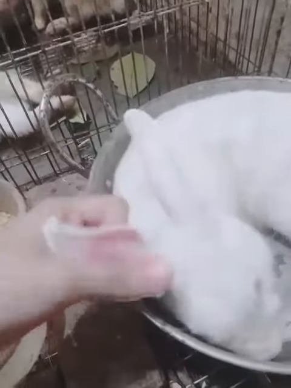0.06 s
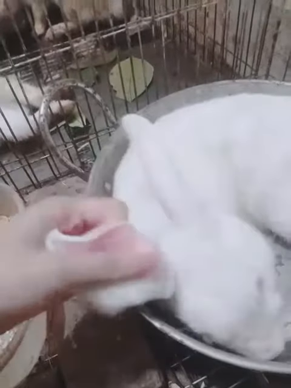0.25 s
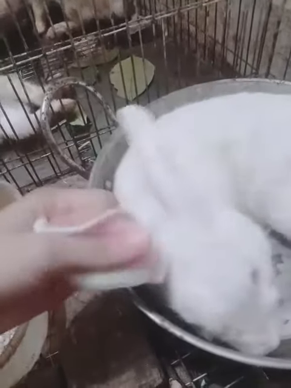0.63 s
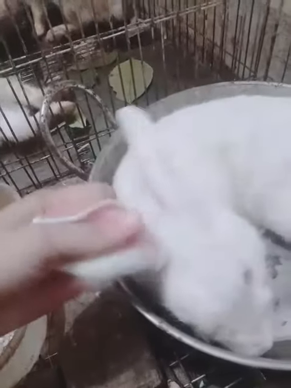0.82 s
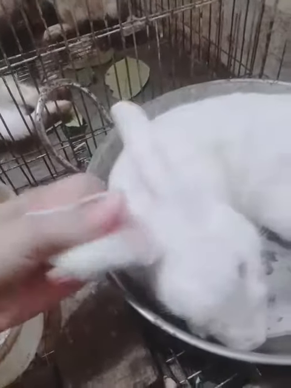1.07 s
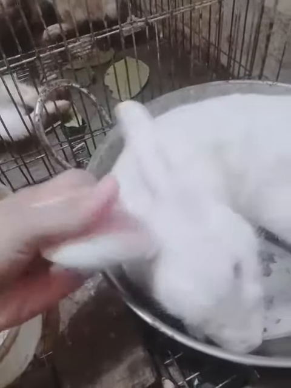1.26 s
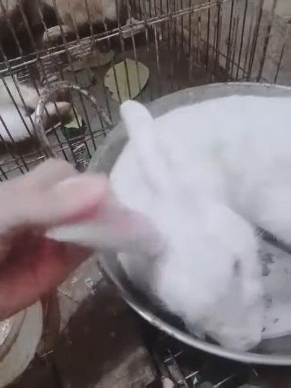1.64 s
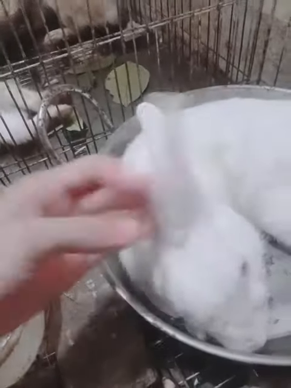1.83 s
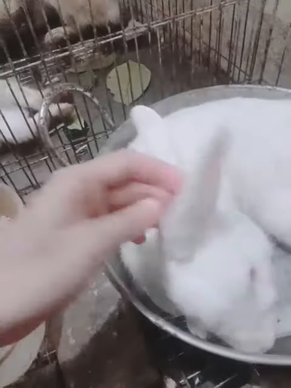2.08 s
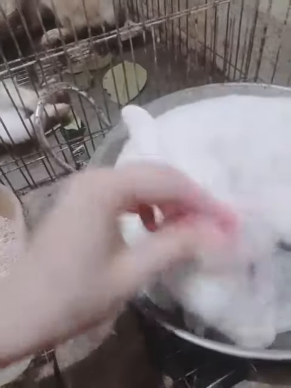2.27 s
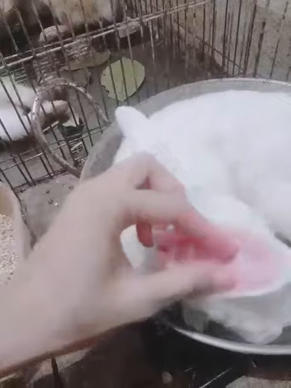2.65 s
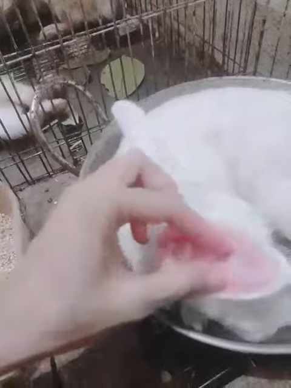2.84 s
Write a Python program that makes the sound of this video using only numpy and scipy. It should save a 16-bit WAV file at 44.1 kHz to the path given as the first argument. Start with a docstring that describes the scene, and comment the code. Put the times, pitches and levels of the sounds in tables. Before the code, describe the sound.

Short, shrill squeaks repeat quickly as a hand softly rubs a rabbit's ear.

```python
"""Fur rustles softly as a hand rubs a rabbit's ear in a small hard-walled room, over a low rumble and hum.
From 0.13 s come short, shrill squeaks, about five a second, each air forced through a tight wet opening:
it pops, its pitch settles, holds and drops, and the walls throw it back. The wavering hum swells at times.
After the last squeak, near 2.4 s, the rustle fades to faint steady microphone hiss,
while rumble and hum go on."""
import sys
import numpy as np
from scipy import signal
from scipy.fft import rfft, irfft
from scipy.io import wavfile
from scipy.ndimage import map_coordinates

SR = 44100
rng = np.random.default_rng(int(sys.argv[2]) if len(sys.argv) > 2 else 0)


def file_out(sig):
    """Save sig as 16-bit WAV at sys.argv[1]."""
    # one column per channel
    cols = np.atleast_2d(sig).T
    # limit, then scale
    lim = np.clip(cols, -1, 1)
    pcm = np.round(lim * 32767).astype(np.int16)
    wavfile.write(sys.argv[1], SR, pcm)


N = 127890

# start_s, start_hz, held_hz, settle_s, drop_share, length_s, level_db, roughness, second_db, higher_db
SQUEAK_EVENTS = [ (0.13, 1127, 1681, .011, 0.202, .040, -45.5, 0.25, 4, -4),
                 (0.42, 2040, 1933, 0.0011, 0.382, .015, -38.5, 0.48, -1, 0),
                 (0.651, 2180, 2036, 0.00098, 0.37, 0.013, -37, 0.34, -0.5, 0.5),
                 (0.871, 2210, 2021, 0.00077, 0.43, .013, -38.5, 0.53, 1.5, 0.5),
                 (1.081, 2186, 2015, .0008, 0.28, 0.014, -38.5, 0.42, -1.5, 0.5),
                 (1.293, 2590, 2066, 0.00088, 0.24, 0.013, -36.5, 0.22, 0.5, 1.5),
                 (1.4999, 2470, 2077, 0.00074, .25, 0.011, -36, 0.2, 1.5, 0.5),
                 (1.697, 2560, 2029, 0.00078, 0.24, .0125, -36, 0.22, -2, 1),
                 (1.898, 2405, 1976, 0.00092, 0.33, 0.012, -39, 0.43, 1.5, 2),
                 (2.119, 2868, 1915, 0.0019, 0.27, .014, -39, 0.64, -0.5, -0.5),
                 (2.355, 1700, 1825, 0.0026, .01, .021, -42, .3, -4, -2), ]
# mouth resonances: freq_hz, gain_db
MOUTH_CURVE = [(700, -29), (1150, -26), (1500, -2), (2000, 4), (2330, -7.5), (2750, 1), (3200, -8.5),
               (3700, -6), (4150, -9.5), (4600, -2.5), (6000, -11.5), (7200, -7.5), (8200, -17.5),
               (10300, -21.5), (12300, -21), (15500, -31)]
# shadowed direct path: freq_hz, gain_db
DIRECT_CURVE = [(2000, -1.5), (3200, -4), (7000, -6), (11000, 1.5)]
# early reflections: delay_s, gain_db
WALL_ECHOES = [(0.01, 2), (.0130, 1), (0.022, -15), (0.039, -8)]
# narrow room and cage resonances: freq_hz, gain_db
ROOM_MODES = [(1814, 6), (1993, 3), (2640, 8), (2877, 7), (4133, 10.5), (6020, 8)]
# diffuse tail: freq_hz, gain_db
TAIL_CURVE = [(1000, 5.5), (2000, -2.5), (3500, 8), (7000, 4), (12000, 7.5)]
# hiss, body: freq_hz, gain_db
HISS_BODY_CURVE = [(900, -12), (2000, -3.5), (3000, -1), (4200, -6), (7000, -4), (10000, -14), (13000, -24)]
# hiss, airy top: freq_hz, gain_db
HISS_TOP_CURVE = [(7000, -28), (10000, -11), (12500, 2.5), (15500, -4.5)]
# levels of fur hiss, then faint microphone hiss: time_s, body_db, top_db
HISS_ENVELOPE = [(0, -57, -62.5), (.1, -69.5, -72), (.33, -63.5, -64), (0.601, -66, -66.5),
                 (.8, -62.5, -67.5), (1.02, -65, -64.5), (1.2, -62, -67.5), (1.4, -65.5, -66.5),
                 (1.65, -65.5, -67.5), (1.95, -66, -82), (2.301, -67.5, -76), (2.5, -67.5, -68),
                 (2.68, -73, -82), (2.8, -70.5, -71), (2.9, -69.5, -71)]
# quick finger brushes: peak_s, width_s, level_db, centre_hz
FINGER_BRUSHES = [(0.254, 0.011, -53.5, 7500), (2.194, 0.015, -55, 14100)]
# room noise: freq_hz, gain_db
RUMBLE_CURVE = [(20, -49), (35, -34), (58, 0), (85, -4), (120, 3), (180, -0.5), (300, -2), (430, -9),
                (750, -14), (1100, -21), (1900, -18), (3000, -34), (8000, -40)]
# room noise level: time_s, level_db
RUMBLE_ENVELOPE = [(0, -52), (.5, -51), (1.5, -51), (2.3, -51), (2.65, -52), (2.9, -53.5)]
# hum swells: peak_s, width_s, gain_db
SWELLS = [(.36, 0.1, 13.5), (1.351, 0.091, 10), (1.98, 0.2, 9.5), (2.581, .06, 16.5)]
# microphone response: freq_hz, gain_db
MIC_CURVE = [(20, -2), (7400, 1), (8100, -7), (8700, -14), (9400, -11), (10200, -5), (11500, -1),
             (16000, 1.5)]


def squeak(start_hz, held_hz, settle_s, drop_share, length_s, roughness, second_db, higher_db):
    """A wet opening pops apart and flutters; roughness adds jitter, subharmonics and air noise."""
    size = 4096
    sag_share, jitter_share, attack_share, release_share = 0.014, 0.055, 0.12, 0.16
    air_db, pop_db, pop_s = -11.5, -6, 0.0042
    t = np.arange(size) / SR
    progress = np.minimum(t / length_s, 1)
    fall_hz = held_hz * (1 - sag_share * progress - drop_share * progress ** 5)
    pitch_hz = fall_hz + (start_hz - held_hz) * np.exp(-t / settle_s)
    pitch_hz *= 1 + jitter_share * roughness * walk(1204, size)
    phase = 2 * np.pi * np.cumsum(pitch_hz) / SR
    bright_db = 3 - 8.5 * progress
    tone = np.zeros(size)
    for k in np.arange(2, 19) / 2:  # half orders: alternating strong and weak cycles
        partial_db = 0 if k < 2 else bright_db + (second_db if k == 2 else higher_db)
        gain = undb(partial_db) * (0.76 * roughness if k % 1 else 1)
        tone += gain * gain_at(k * pitch_hz, MOUTH_CURVE) * np.sin(k * phase + 2 * np.pi * rng.random())
    noise = unit(colour(rng.standard_normal(size), MOUTH_CURVE))
    air = noise * (1 + np.cos(phase)) * roughness * undb(air_db)
    pop = noise * undb(pop_db) * np.exp(-t / pop_s)
    envelope = np.clip(progress / attack_share, 0, 1) * np.clip((1 - progress) / release_share, 0, 1)
    return (tone + air) * envelope + pop


def squeaks():
    """All squeaks at their times and levels."""
    out = np.zeros(N)
    for start_s, *contour, level_db, roughness, second_db, higher_db in SQUEAK_EVENTS:
        sound = squeak(*contour, roughness, second_db, higher_db)
        i = int(start_s * SR)
        out[i:i + len(sound)] += undb(level_db) * sound
    return out


def room(x):
    """Shadowed direct path plus a short diffuse tail, wall echoes and narrow resonances."""
    onset_s, split_hz = 0.0085, 3000
    low_t60_s, high_t60_s, mode_t60_s = 0.3, 0.26, 0.32
    t = np.arange(SR // 2) / SR
    tail = np.zeros(len(t))
    for band, t60_s in (("low", low_t60_s), ("high", high_t60_s)):
        sos = signal.butter(2, split_hz, band, fs=SR, output="sos")
        tail += signal.sosfilt(sos, rng.standard_normal(len(t))) * 1000 ** (-t / t60_s) * (t > onset_s)
    response = colour(tail / np.linalg.norm(tail), TAIL_CURVE) * undb(-0.5)
    for delay_s, gain_db in WALL_ECHOES:
        response[int(delay_s * SR)] += undb(gain_db)
    decay_per_s = np.log(1000) / mode_t60_s
    ring_down = 2 * decay_per_s / SR * np.exp(-decay_per_s * t)  # unity gain at resonance
    for freq_hz, gain_db in ROOM_MODES:
        response += undb(gain_db) * ring_down * np.sin(2 * np.pi * freq_hz * t)
    return colour(x, DIRECT_CURVE) + signal.fftconvolve(x, response)[:N]


def fur_and_hiss(t):
    """Flickering hiss of stroked fur with quick finger brushes, fading to faint microphone hiss."""
    flicker_db, flicker_hz = 2, 34.46
    time_s, body_db, top_db = np.array(HISS_ENVELOPE).T
    out = np.zeros(N)
    for curve, level_db in ((HISS_BODY_CURVE, body_db), (HISS_TOP_CURVE, top_db)):
        out += unit(colour(rng.standard_normal(N), curve)) * undb(np.interp(t, time_s, level_db))
    out *= undb(flicker_db * walk(flicker_hz, N))
    for peak_s, width_s, level_db, centre_hz in FINGER_BRUSHES:
        curve = [(centre_hz / 4, -14), (centre_hz, 0), (centre_hz * 3, -10)]
        hiss = unit(colour(rng.standard_normal(N), curve))
        out += hiss * undb(level_db) * np.exp(-((t - peak_s) / width_s) ** 2)
    return out


def rumble(t):
    """Low, nearly steady room noise."""
    time_s, level_db = np.array(RUMBLE_ENVELOPE).T
    return unit(colour(rng.standard_normal(N), RUMBLE_CURVE)) * undb(np.interp(t, time_s, level_db))


def hum(t):
    """One tone that wavers in pitch and level and swells at times."""
    centre_hz, base_db, waver_db = 261.6, -61.5, 1.5
    pitch_hz = centre_hz * (1 + 0.01366 * walk(12, N))
    phase = 2 * np.pi * np.cumsum(pitch_hz) / SR
    swell_db = sum(db * np.exp(-((t - peak_s) / width_s) ** 2) for peak_s, width_s, db in SWELLS)
    return np.sin(phase) * undb(base_db + swell_db + waver_db * walk(6.76, N))


def undb(db):
    """Decibels to gain."""
    return 10 ** (np.asarray(db) / 20)


def unit(x):
    """Scale to rms 1."""
    return x / np.sqrt(np.mean(x ** 2))


def gain_at(hz, points):
    """Gain of a (Hz, dB) curve."""
    f, db = np.array(points, float).T
    return undb(np.interp(np.log(hz + 1), np.log(f), db))


def colour(x, points):
    """Filter a sound by a (Hz, dB) curve."""
    size = 2 * len(x)
    return irfft(rfft(x, size) * gain_at(np.fft.rfftfreq(size, 1 / SR), points), size)[:len(x)]


def walk(rate_hz, size):
    """Smooth random wander of spread about 1."""
    u = np.arange(size) * rate_hz / SR
    return map_coordinates(rng.standard_normal(4096), [u], order=3, mode="wrap")


def scene():
    """Squeaks in the room over fur, hiss, rumble and hum; mono."""
    t = np.arange(N) / SR
    return (room(squeaks()) + fur_and_hiss(t) + rumble(t) + hum(t))[None]


def record(dry):
    """Phone microphone: treble notch, steep top cut."""
    cutoff_hz = 15850
    lowpass = signal.ellip(10, 0.2, 70, cutoff_hz, fs=SR, output="sos")
    return signal.sosfilt(lowpass, colour(dry[0], MIC_CURVE))[None]


dry = scene()
out = record(dry)
file_out(out)
```